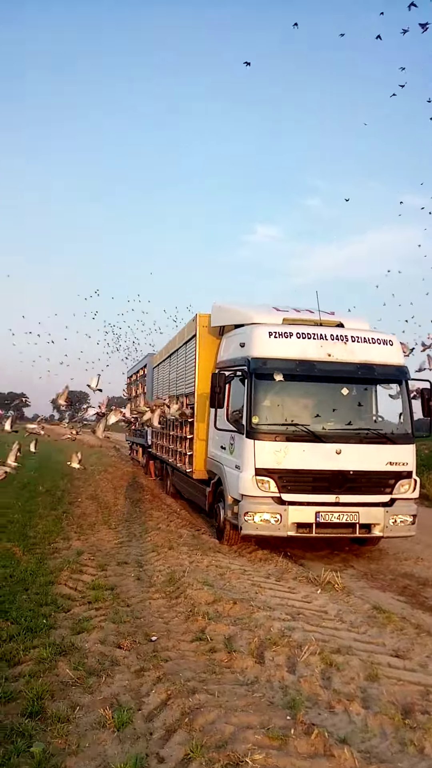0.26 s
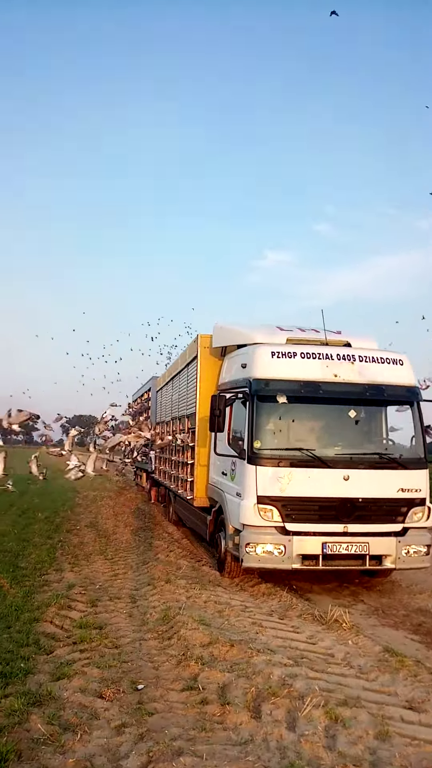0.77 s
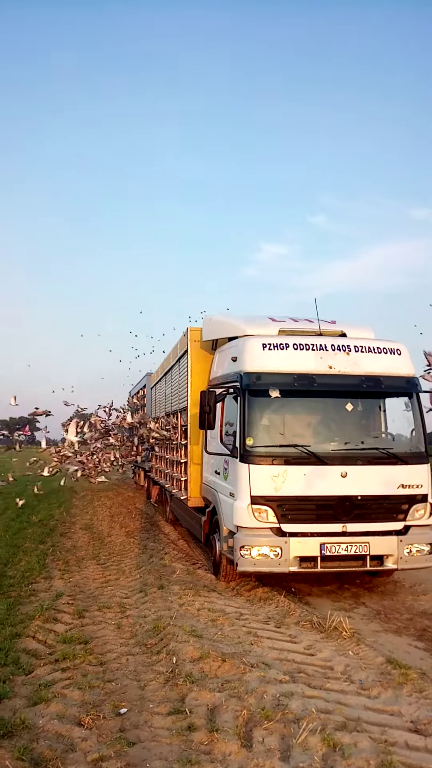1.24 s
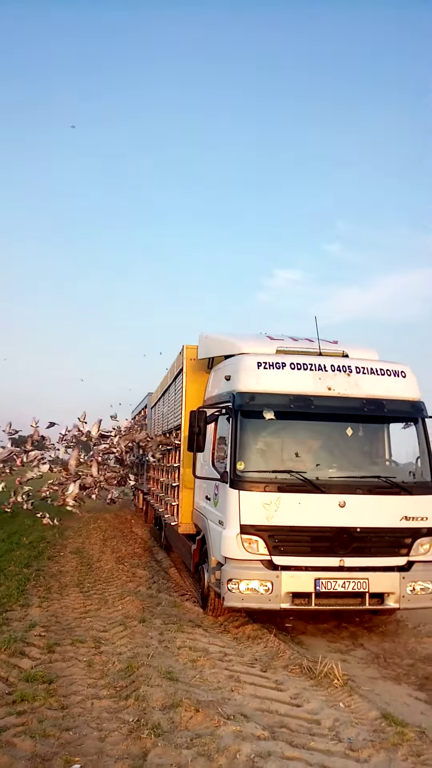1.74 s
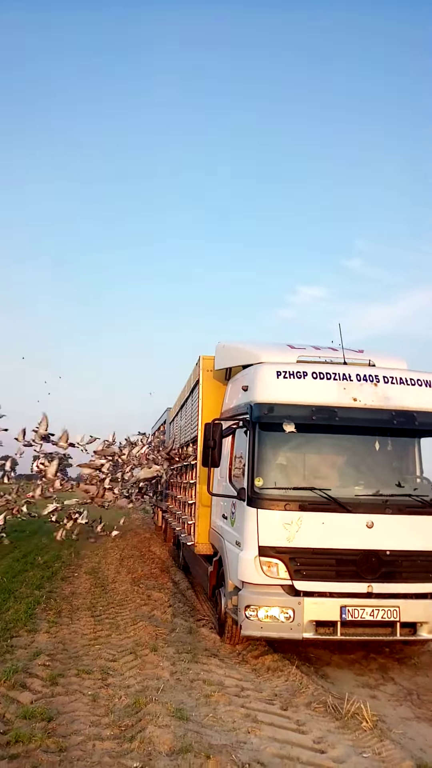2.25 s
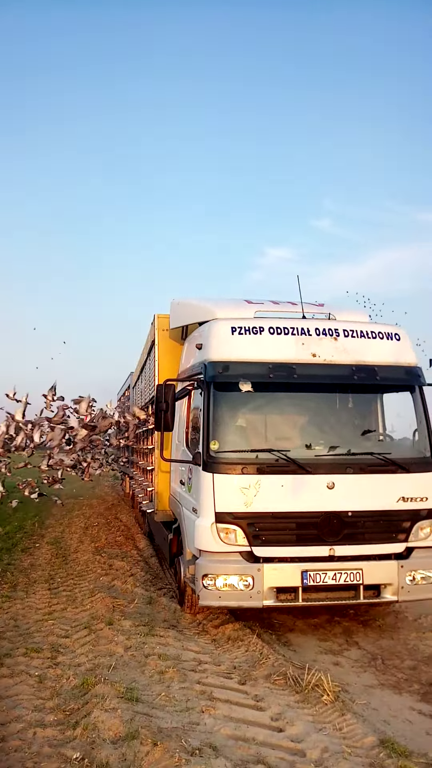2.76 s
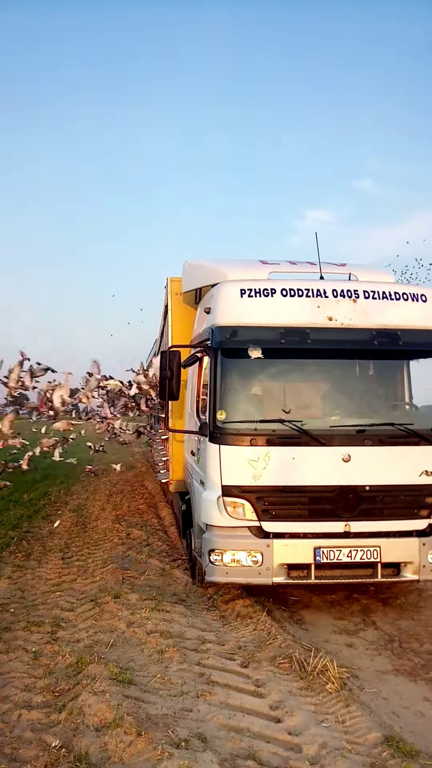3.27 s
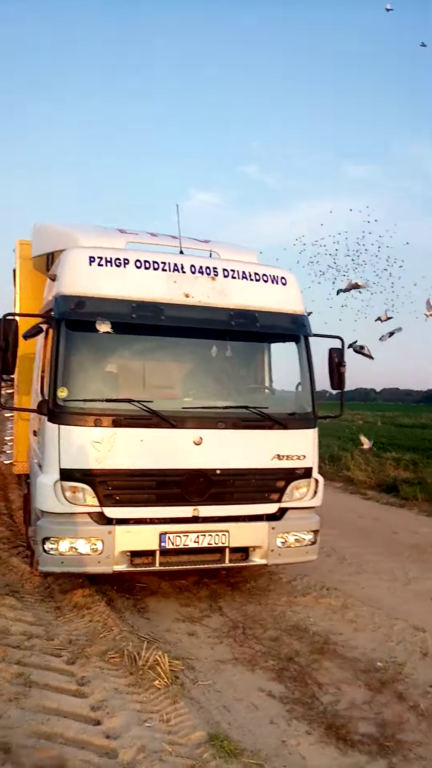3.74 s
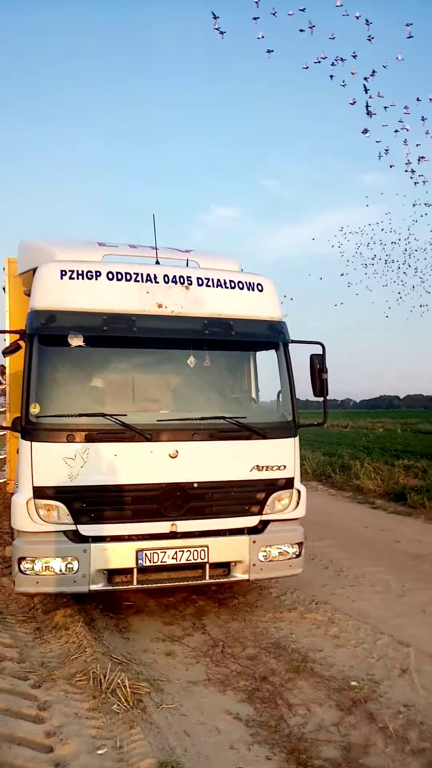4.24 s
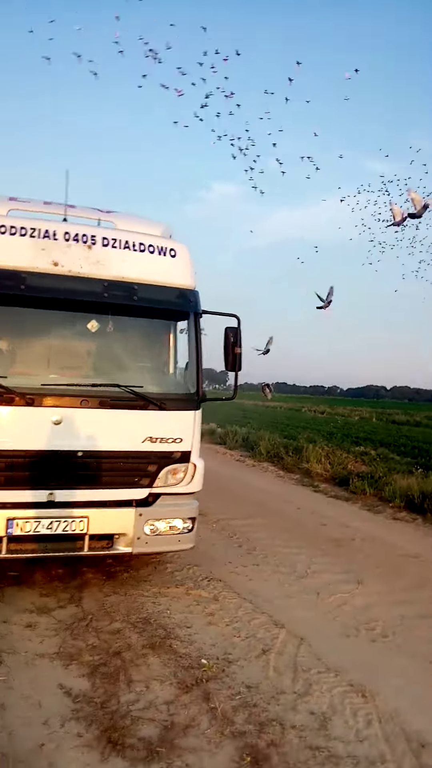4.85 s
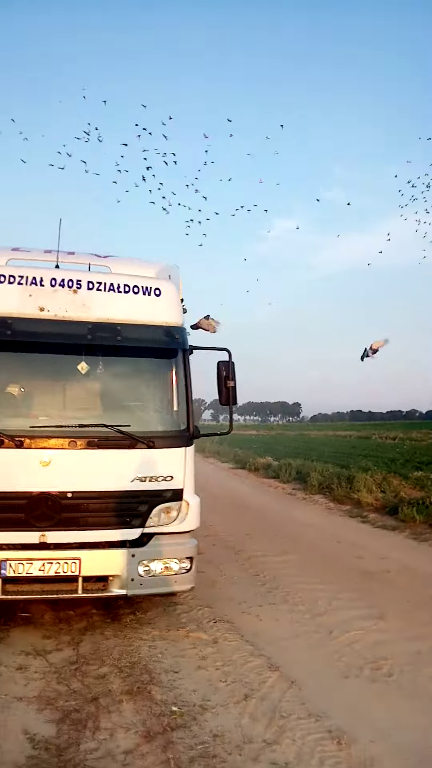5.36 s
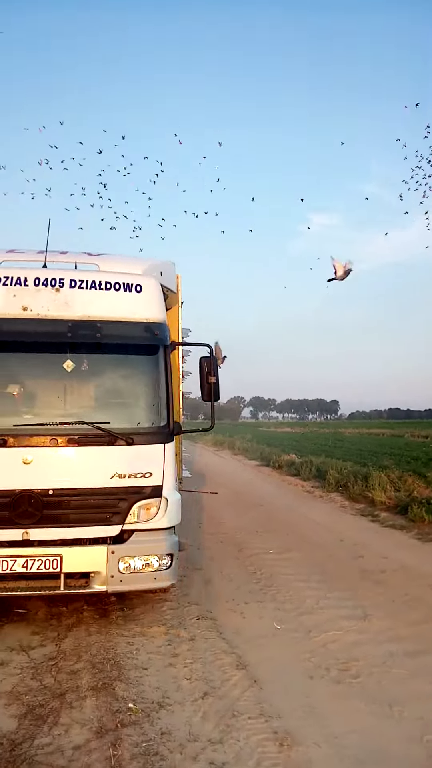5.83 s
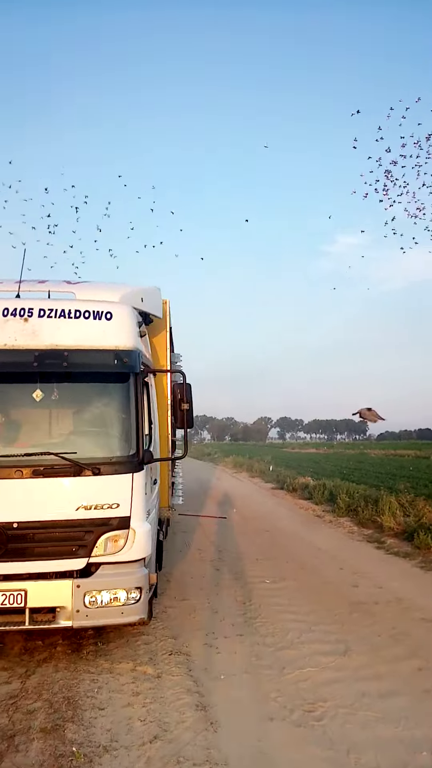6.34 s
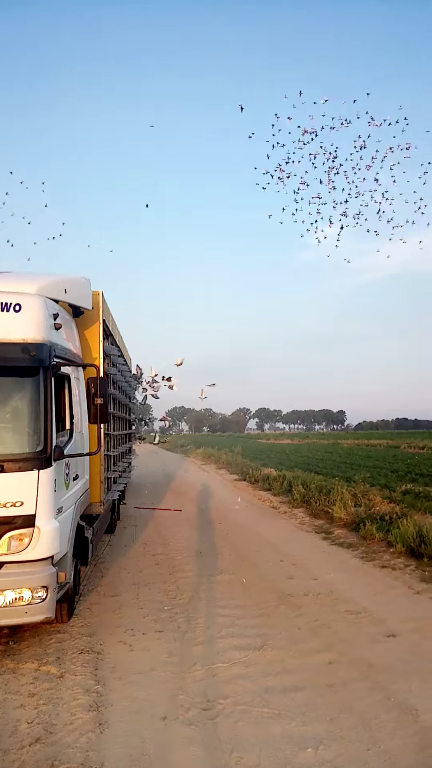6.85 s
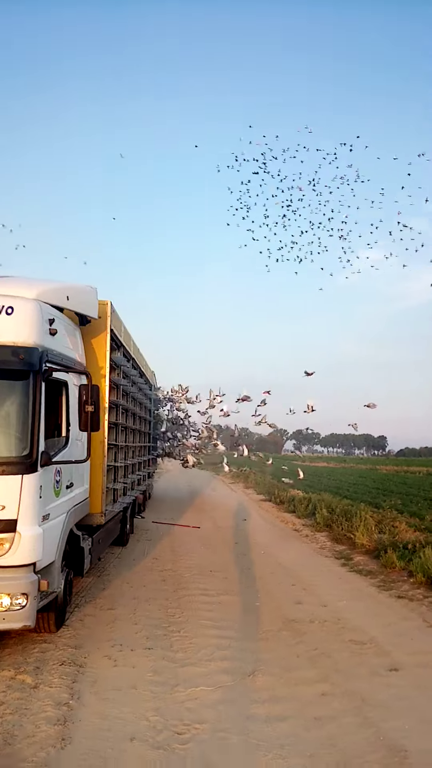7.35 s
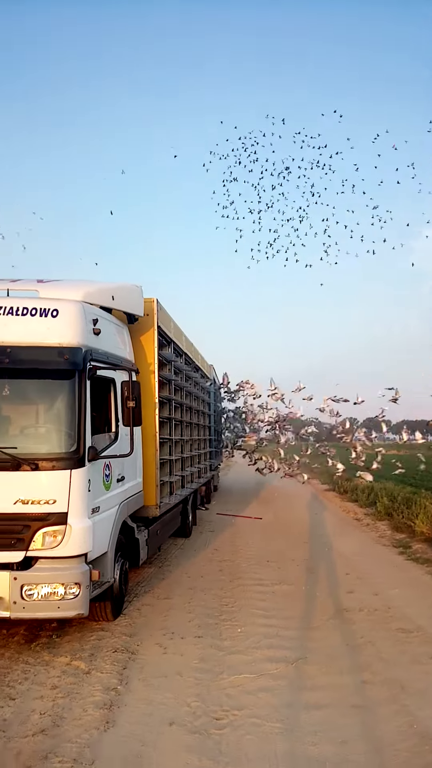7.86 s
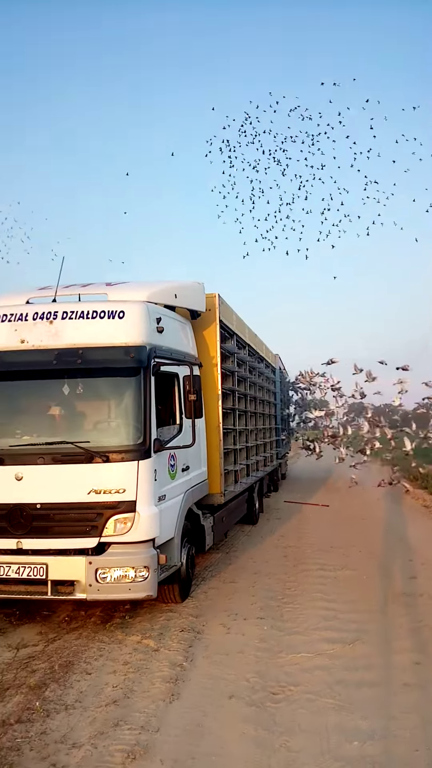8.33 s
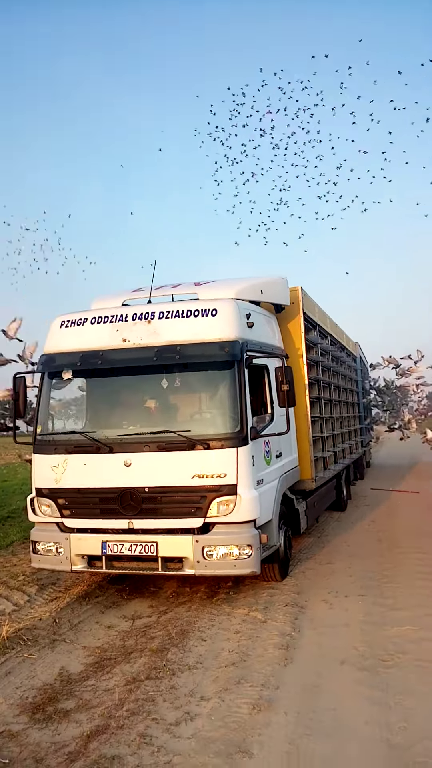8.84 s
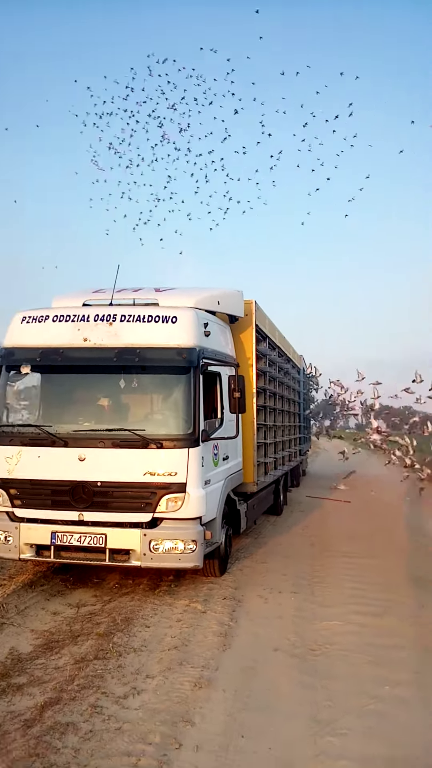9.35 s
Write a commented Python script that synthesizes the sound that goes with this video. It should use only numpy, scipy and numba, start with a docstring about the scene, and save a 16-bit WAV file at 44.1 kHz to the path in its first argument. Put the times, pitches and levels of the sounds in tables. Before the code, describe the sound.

Throughout about 9.6 seconds, hundreds of pigeons leave a lorry in open farmland: a dense, dry, rapid flutter of feathers, bright and grainy, over a softer mid-low whoosh of pushed air. From 0 to 1.4 s, uneven low wind gusts bump the phone microphone, with harder buffets near 0.5 s. Wind eases around 1.5-2.3 s and the wings come forward, swelling near 2.2 s. From 2.4 s gusts build again, becoming heavy, distorted thuds and crackling rumble at 2.8-3.5 s, with the flutter ducked beneath. By 4 s the wind falls away, leaving small low puffs until about 6.7 s. Crisp single wing claps pass close at 3.7-4.5 s and scatter through 5-7.5 s. The flutter thins near 6.7 s, then grows fuller and brighter towards 8.5 s and continues to the end. A faint, flickering, very high whistle appears intermittently. Dry open air, no echo.

```python
"""Pigeon release in gusty wind

Hundreds of pigeons pour out of a transport lorry and fly off over open fields: slapping feathers
and puffs of air make a dense flutter, and near birds add sharp wing claps made of short noise bursts.
Gusts sweep eddies and vortices over a phone's microphone; its gain control pushes the flutter down
under the strongest ones. A faint, very high whistle, a wavering sine, comes and goes."""
import sys
import numpy as np
from scipy.fft import rfft, irfft, next_fast_len
from scipy.io import wavfile
from scipy.ndimage import uniform_filter1d, minimum_filter1d, map_coordinates
from numba import njit

SR = 44100
rng = np.random.default_rng(int(sys.argv[2]) if len(sys.argv) > 2 else 0)


def log_audio(samples):
    """Write samples as a 16-bit WAV file to the path given in sys.argv[1]."""
    # one column per channel
    frames = np.atleast_2d(samples).T
    # limit to full scale, then quantise
    limited = np.clip(frames, -1, 1)
    pcm = np.round(limited * 32767).astype(np.int16)
    wavfile.write(sys.argv[1], SR, pcm)


N = 423360

# tone colour of the feathers as the phone's microphone hears them: (f/Hz, relative gain/dB)
FEATHER_COLOUR = [(300, -30), (750, -9), (1000, -3), (1200, -1.5), (1800, -3.5), (2250, -0.5), (2900, -7),
                  (4200, -7), (6000, -1), (7600, -4), (8500, -0.5), (9400, -7), (10600, -16.5),
                  (13800, -23.5), (14800, -13.5)]


def amp(db):
    """Decibels to gain."""
    return 10 ** (np.asarray(db) / 20)


def unit(x):
    """Scale to rms 1."""
    return x / np.sqrt(np.mean(x ** 2) + 1e-20)


def clock():
    """The time of every sample in seconds."""
    return np.arange(N) / SR


def curves(rows):
    """One value per sample for each column after the time."""
    s, *columns = np.transpose(rows)
    return [np.interp(clock(), s, column) for column in columns]


def wobble(rate):
    """A smooth random curve through `rate` random knots a second."""
    knots = rng.standard_normal(int(N * rate / SR) + 4)
    return map_coordinates(knots, [clock() * rate])


def filtered(x, response):
    """x with its spectrum multiplied by response(Hz), without phase shift."""
    size = x.shape[-1]
    padded = next_fast_len(size + 8192)
    hz = np.fft.rfftfreq(padded, 1 / SR) + 1e-3
    return irfft(rfft(x, padded) * response(hz), padded)[..., :size]


def shape(points, hz):
    """Gain at hz from (Hz, dB) points joined on a log frequency axis."""
    f, db = np.transpose(points)
    return amp(np.interp(np.log(hz), np.log(f), db))


def coloured(x, points):
    """x filtered by the (Hz, dB) points, at rms 1."""
    return unit(filtered(x, lambda hz: shape(points, hz)))


def placed(times, sounds):
    """Sum each row of sounds at its time."""
    starts = np.round(np.maximum(times, 0) * SR).astype(int)
    at = starts[:, None] + np.arange(sounds.shape[1])
    return np.bincount(at.ravel(), sounds.ravel(), N)[:N]


def slaps(centre_hz, life, attack, octaves, broad, grain_db):
    """Feather contacts: per row a grainy noise burst, a resonant hump over broadband, sudden then dying."""
    size = 1024
    t, hz = np.arange(size) / SR, np.fft.rfftfreq(size, 1 / SR) + 1
    hump = np.exp(-.5 * (np.log2(hz / centre_hz[:, None]) / octaves) ** 2)
    white, grain = rng.standard_normal((2, len(life), size))
    noise = irfft(rfft(white * amp(grain_db * grain)) * (broad + hump))
    noise = noise / noise.std(axis=1, keepdims=True)
    envelope = (1 - np.exp(-t / attack)) ** 2 * np.exp(-t / life[:, None])
    return noise * envelope / envelope.max(axis=1, keepdims=True)


def wingbeats(beat_hz, distance_db, stroke_db, count, order):
    """Count birds each give `order` hard take-off strokes near their own tempo: times and sizes."""
    start = (np.arange(count) + rng.random(count)) / count * N / SR
    tempo = beat_hz * np.exp(.15 * rng.standard_normal((count, 1)))
    beats = np.arange(order) + .05 * rng.standard_normal((count, order))
    times = start[:, None] + beats / tempo
    bird_db = distance_db * rng.uniform(-0.12, 1, (count, 1))
    db = bird_db + stroke_db * rng.uniform(-0.34, 1, (count, order))
    # strokes past the end wrap to the start
    return times.ravel() % (N / SR), amp(db).ravel()


def flock(slap_db, swish_db, air_db, life, thump_hz, thump_db, crowding):
    """Each stroke slaps the feathers and pushes a puff of air; the far birds merge into a swish."""
    # the stream of birds: (t/s, relative level/dB, relative brightness/dB)
    stream = [(0, -41.5, 1.5), (.2, -35.5, 0), (.395, -38, -0.5), (.44, -32, 0), (.52, -37.5, 2),
              (.8, -36, 0.5), (1.85, -35, 2.5), (2.08, -38, 2), (2.16, -33.5, 2), (2.33, -36, 2),
              (2.6, -40.5, 2.5), (3.2, -37.5, 1), (3.75, -37.5, 3), (4.4, -39.5, -2), (5.1, -38.5, 1),
              (5.55, -40, -2), (6.7, -40.5, 0.5), (7.4, -37.5, 1), (8.5, -36.5, 3), (9.6, -37, 1)]
    # colour of the air pushed by the wings: (f/Hz, relative gain/dB)
    air_colour = [(60, -11.5), (160, -6.5), (330, 0.5), (480, -6), (620, -2), (770, 1), (860, -3),
                  (1000, -12), (2000, -70)]
    level_db, bright_db = curves(stream)
    # the typical tempo is 8.5 wingbeats a second
    times, sizes = wingbeats(beat_hz=8.5, distance_db=-3.5, stroke_db=8.0, count=430, order=5)
    chance = rng.standard_normal((len(times), 3))
    centre_hz = 4500 * np.exp(0.55 * chance[:, 0])
    lives = life * np.exp(.5 * chance[:, 1])
    strokes = slaps(centre_hz, lives, attack=0.0017, octaves=0.2, broad=0.93, grain_db=4.5)
    flutter = coloured(placed(times, sizes[:, None] * strokes), FEATHER_COLOUR)
    swish = coloured(rng.standard_normal(N) * amp(0.29 * wobble(60)), FEATHER_COLOUR)

    # the thicker the stream of birds, the less single strokes stand out
    crowd_db = crowding * (level_db - level_db.mean())
    feathers = amp(slap_db - crowd_db) * flutter + amp(swish_db + crowd_db) * swish
    treble = filtered(feathers, lambda hz: 1 / (1 + (4000 / hz) ** 4))
    feathers = feathers + (amp(bright_db - 6.5) - 1) * treble

    # each puff of air is a sine that dies away within a cycle or two
    cycles = thump_hz * np.exp(.5 * chance[:, 2:]) * np.arange(SR // 50) / SR
    puff = np.sin(2 * np.pi * cycles) * np.exp(-1.5 * cycles)
    thumps = coloured(placed(times, sizes[:, None] * puff), air_colour)
    rush = coloured(rng.standard_normal(N), air_colour)
    air = unit(amp(thump_db) * thumps + rush)
    return amp(level_db) * (feathers + amp(air_db) * air)


def wind(speed_db, calm, rush, port_hz, lumpy_db, swell_db, gain_db, burst_db):
    """Eddies sweep over the microphone port: faster air is louder and carries them past more quickly."""
    # long gusts, then a light breeze: (t/s, relative strength/dB)
    gust_curve = [(0, -18.5), (1.37, -17.5), (1.46, -26), (1.72, -30), (1.8, -24), (2.1, -22), (2.31, -28),
                  (2.62, -17.5), (2.82, -9), (3.11, -13), (3.18, -18), (3.24, -27), (3.31, -5), (3.51, -7),
                  (3.6, -18), (3.9, -23), (3.95, -38), (4.9, -31), (5.55, -35.5), (9.2, -36), (9.6, -30.5)]
    # eddies on the port at a travel speed of 1: (f/Hz, relative gain/dB)
    eddy_colour = [(30, 0), (60, 4.5), (110, 2), (170, -3.5), (260, -10), (380, -20.5), (550, -33),
                   (900, -46), (2000, -72), (5000, -120)]
    gust_db = curves(gust_curve)[0] + swell_db * np.tanh(wobble(16))
    pressure = np.maximum(amp(gust_db), puffs())
    lasting_db = 20 * np.log10(uniform_filter1d(pressure, size=SR // 3))

    # read a fixed eddy pattern at the speed of the air
    speed = calm + rush * np.tanh(uniform_filter1d(pressure, size=SR // 8) / amp(speed_db))
    travel = np.cumsum(speed)
    field = coloured(rng.standard_normal(int(travel[-1]) + 2), eddy_colour)
    eddies = np.interp(travel, np.arange(len(field)), field) * amp(lumpy_db * np.tanh(wobble(90)))
    # single eddies differ in size, but over a few of them the gust alone sets the level
    eddies = pressure * eddies / np.sqrt(uniform_filter1d(eddies ** 2, size=SR // 22))

    spikes = bursts(pressure, lasting_db, onset_db=-15.0, width=0.00035, count=3200)
    trains = buffets(lasting_db, full_hz=682, db_per_octave=20, gain_db=-2.0,
                     jitter=0.23, spread=0.23, order=4)
    total = eddies + amp(burst_db) * spikes + trains
    # the port passes no deep bass
    return amp(gain_db) * filtered(total, lambda hz: 1 / (1 + (port_hz / hz) ** 4))


def buffets(lasting_db, full_hz, db_per_octave, gain_db, jitter, spread, order):
    """Each buffet swells and fades over a few unevenly spaced vortices, sharper in a stronger gust."""
    # hard buffets on the port: (t/s, relative level/dB, half length/s)
    hard_hits = [(0.024, -18, 0.018), (.457, -15, 0.011), (0.502, -12, 0.0045), (0.789, -16, 0.0094),
                 (2.669, -12, 0.0034), (2.693, -14, 0.0031), (2.727, -15, 0.0037), (2.777, -8, .006),
                 (2.792, -7, 0.0039), (2.809, 4, .0015), (2.835, -18, 0.0031), (2.855, -13, 0.0018),
                 (2.904, -1.5, 0.0054), (2.916, -1, 0.0028), (2.975, -11, 0.0072), (3.087, -5, 0.011),
                 (3.171, -9.5, 0.0062), (3.21, -15.5, 0.0014), (3.305, -11, .01), (3.33, -6.5, .011),
                 (3.398, -2, 0.0041), (4.725, -15.5, 0.0067)]
    gap_s = 0.00272  # typical time between vortices
    s, db, half = np.transpose(hard_hits)[:, :, None]
    hz = full_hz * 2 ** (np.interp(s, clock(), lasting_db) / db_per_octave)
    steps = np.arange(-order, order + 1)
    late, wide = rng.standard_normal((len(s), 2, len(steps))).swapaxes(0, 1)
    size = amp(db + gain_db) * np.exp(-(gap_s * steps / half) ** 2)
    # hz becomes the strongest frequency of a spike, before its random spread
    widths = np.exp(spread * wide) / (np.sqrt(2) * np.pi * hz)
    spikes = vortex(widths.ravel())
    times = s + gap_s * (steps + jitter * late) - spikes.shape[1] / SR / 2
    return placed(times.ravel(), size.reshape(-1, 1) * spikes)


def vortex(width):
    """One pressure spike with a dip on either side for each width (s)."""
    u = np.arange(-SR // 200, SR // 200) / SR / width[:, None]
    return (1 - u * u) * np.exp(-u * u / 2)


def puffs():
    """Strength of the single puffs: each swells and fades, and the strongest wins."""
    # the strongest single puffs of wind: (t/s, relative strength/dB, half length/s)
    single_puffs = [(0.025, -11, 0.024), (0.123, -13, .015), (.366, -13, .018), (0.467, -10, 0.022),
                    (0.501, -6, 0.013), (0.686, -11, 0.013), (0.758, -12, 0.019), (1.044, -12, 0.015),
                    (1.259, -14, .025), (1.54, -18.5, 0.017), (2.051, -15, 0.014), (2.199, -21, 0.027),
                    (2.362, -12, .012), (2.395, -9, 0.0075), (2.428, -10, 0.0097), (2.499, -8, 0.008),
                    (2.545, -8, 0.0097), (2.613, -10, 0.015), (2.67, -11, 0.0092), (2.812, -4, 0.013),
                    (2.906, -3, 0.01702), (3.09, -4, 0.018), (3.69, -13, 0.0098), (3.833, -13, 0.019),
                    (4.529, -18.5, 0.014), (4.604, -18, 0.024), (4.666, -19, .008), (4.715, -17, .014),
                    (4.811, -20, .013), (4.925, -24.5, 0.029), (5.017, -23, 0.016), (5.129, -21, 0.021),
                    (5.295, -18.5, 0.0298), (5.731, -22.5, 0.02), (5.791, -25, .024), (6.05, -23.5, 0.029),
                    (6.49, -23.5, 0.035), (6.622, -26, 0.024), (6.707, -28, 0.024), (9.34, -26.5, 0.023)]
    s, db, half = np.transpose(single_puffs)[:, :, None]
    return np.max(amp(db) * np.exp(-np.minimum(((clock() - s) / half) ** 2, 20)), axis=0)


def bursts(pressure, lasting_db, onset_db, width, count):
    """Only a hard, lasting gust breaks into small vortices on the port, each a short pressure spike."""
    when, luck, size, spread = rng.random((count, 4)).T
    at = (when * N).astype(int)
    # from never at the onset to always 5 dB above it
    fires = luck < np.clip((lasting_db[at] - onset_db) / 5, 0, 1)
    sizes = fires * np.sqrt(pressure[at]) * size
    return placed(at / SR, sizes[:, None] * vortex(width * 2 ** spread))


def whistle(gain_db, waver_hz, drift_hz, flicker_db):
    """A thin, wavering and flickering sine that steps between pitches; notes glide, swell or fade."""
    # notes before waver: (start t/s, end t/s, first f/Hz, glide/Hz,
    # relative start level/dB, relative end level/dB)
    notes = [(0, .3, 9520, -10, -49, -47), (.62, 1.08, 9520, 70, -53, -47),
             (2.45, 3.19, 10200, 0, -51, -45), (3.23, 4.05, 9650, 0, -52, -60),
             (4.27, 4.54, 11410, -20, -63, -61), (6.2, 6.6, 9520, 0, -53, -63),
             (8, 8.33, 9750, -140, -62, -53), (8.385, 8.88, 10200, 60, -51, -50),
             (9.2, 9.6, 9680, -250, -53, -61)]
    t, tone = clock(), np.zeros(N)
    waver = waver_hz * wobble(25) + drift_hz * wobble(3.6)
    for start, end, first_hz, glide_hz, *levels in notes:
        on = (t > start) & (t < end)
        part = (t[on] - start) / (end - start)
        hz = first_hz + glide_hz * part + waver[on]
        db = np.interp(part, [0, 1], levels)
        fade = np.minimum(np.minimum(t[on] - start, end - t[on]) / 0.0067, 1)
        sine = np.sqrt(2) * np.sin(2 * np.pi * np.cumsum(hz) / SR)
        tone[on] += amp(db + gain_db) * fade * sine
    return tone * unit(amp(flicker_db * np.tanh(wobble(30))))


def claps(gain_db, life, second_db, lag, brush_db, dulling):
    """Near birds: the wings brush, their tips meet with a crack, and the long feathers follow just after."""
    # the loudest wing-tip claps before feather colouring: (t/s, relative level/dB, centre f/Hz)
    clap_list = [(.197, -19, 2080), (0.407, -16, 2106), (.416, -17, 2499), (.998, -17, 1890),
                 (1.864, -17, 1300), (1.913, -17, 4500), (3.24, -21, 4967), (3.718, -18.5, 2403),
                 (3.804, -19.5, 2270), (3.881, -21, 2310), (3.94, -15, 3297), (3.96, -18.5, 7000),
                 (4.111, -18, 2287), (4.161, -17.5, 2200), (4.168, -19.5, 2000), (4.27, -19.5, 2620),
                 (4.282, -22, 5000), (4.39, -20, 6020), (4.525, -24, 6310), (5.028, -22.5, 6510),
                 (5.159, -20, 2517), (5.417, -20, 2405), (5.448, -21.5, 3999), (5.583, -27.5, 1900),
                 (5.688, -21.5, 2295), (5.905, -20, 6998), (5.921, -20.5, 2200), (6.017, -20, 2193),
                 (6.061, -25, 4990), (6.137, -19.5, 1599), (6.361, -22, 5000), (6.42, -24, 7500),
                 (6.452, -25, 2093), (6.474, -21.5, 2403), (6.727, -25, 2000), (6.838, -20, 2300),
                 (7.235, -18.5, 2000), (7.314, -23, 5500), (7.493, -23, 6510), (8.486, -23, 6580),
                 (8.56, -21, 2385), (8.967, -19.5, 2200)]
    s, db, pitch_hz = np.transpose(clap_list)
    delay = lag * np.exp(.35 * rng.standard_normal(len(s)))
    lives = np.full(len(s), life)

    def crack():
        """A fresh noise burst for every clap."""
        return amp(db)[:, None] * slaps(pitch_hz, lives, attack=0.00034, octaves=0.48, broad=1.0, grain_db=3)

    brush = crack()[:, ::-1]  # reversed, so it swells up to the contact
    contact = placed(s, crack()) + amp(second_db) * placed(s + delay, crack())
    contact = contact + amp(brush_db) * placed(s + .002 - brush.shape[1] / SR, brush)
    # close by, the feathers keep more of their body and top
    return amp(gain_db) * filtered(contact, lambda hz: shape(FEATHER_COLOUR, hz) ** dulling)


def scene():
    """Birds, wind and whistle in the open, with no echo."""
    birds = flock(slap_db=1.0, swish_db=0.5, air_db=-0.5, life=0.0018,
                  thump_hz=400, thump_db=-3, crowding=0.19)
    gusts = wind(speed_db=-7.5, calm=.72, rush=1.5, port_hz=62.1,
                 lumpy_db=4.5, swell_db=1.5, gain_db=2.5, burst_db=-11.0)
    thin_tone = whistle(gain_db=-0.5, waver_hz=12.7, drift_hz=7, flicker_db=7)
    near = claps(gain_db=-3, life=0.0033, second_db=-9, lag=.005, brush_db=-14, dulling=0.88)
    return (birds + near + gusts + thin_tone)[None]


@njit
def follow(size, rise, fall):
    """An envelope with separate rates for rising and falling (share of the gap closed per sample)."""
    out, level = np.empty(len(size)), 0.0
    for i in range(len(size)):
        level += (size[i] - level) * (rise if size[i] > level else fall)
        out[i] = level
    return out


def gain_control(x, threshold_db, slope, attack, release):
    """Turns everything down while the sound is loud, looking slightly ahead."""
    level = follow(np.abs(x), 1 / (attack * SR), 1 / (release * SR))
    gain = (1 + (level / amp(threshold_db)) ** 4) ** (-min(slope, 1) / 4)
    return x * uniform_filter1d(minimum_filter1d(gain, size=180), size=180)


def record(dry):
    """The phone rides its gain and keeps nothing above its band limit."""
    held = gain_control(dry[0], threshold_db=-12, slope=.8, attack=.002, release=.04)
    top_hz = 15780
    return filtered(held, lambda hz: hz < top_hz)[None]


dry = scene()
out = record(dry)
log_audio(out)
```